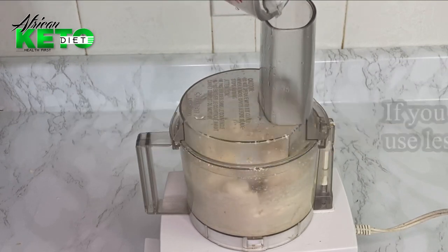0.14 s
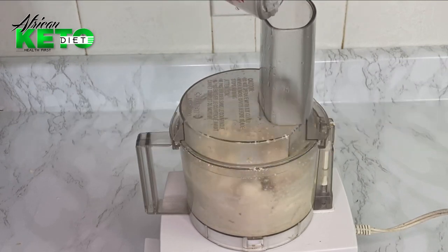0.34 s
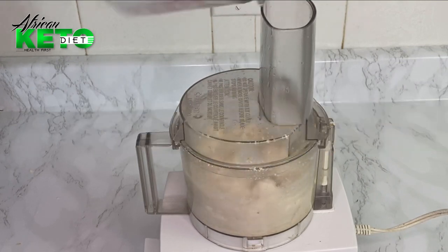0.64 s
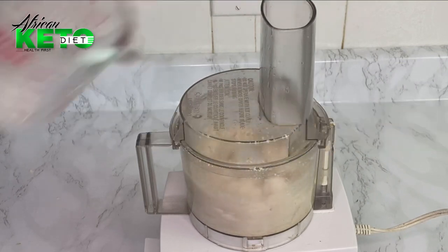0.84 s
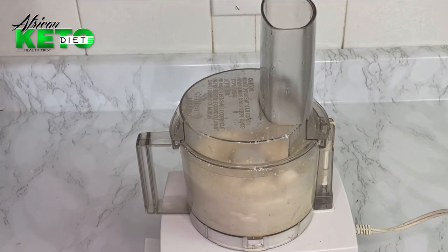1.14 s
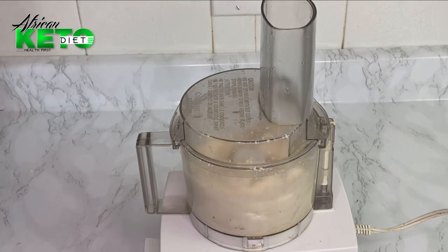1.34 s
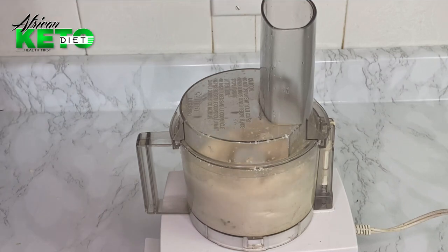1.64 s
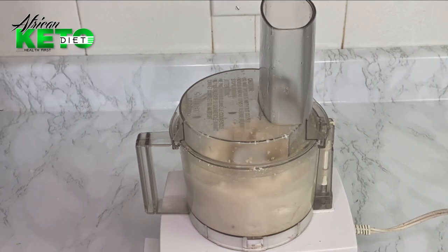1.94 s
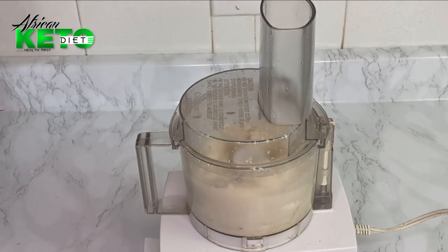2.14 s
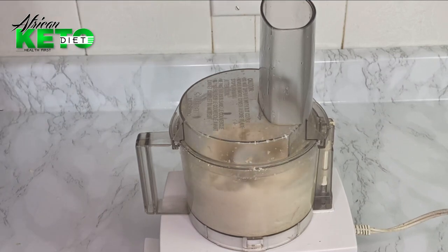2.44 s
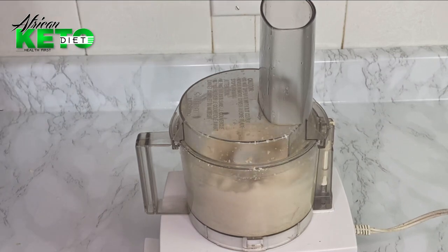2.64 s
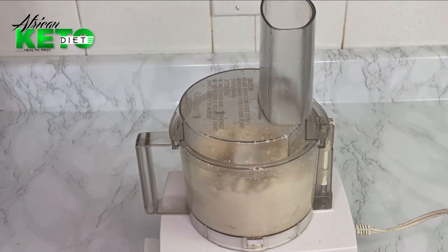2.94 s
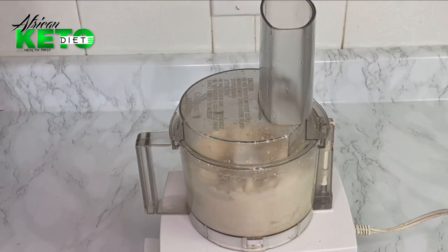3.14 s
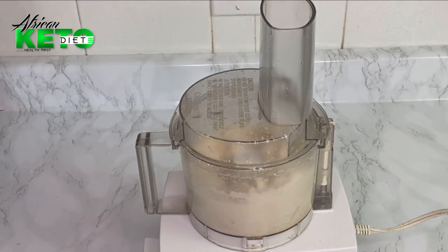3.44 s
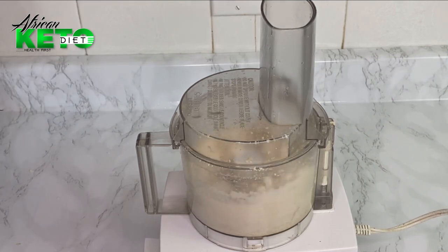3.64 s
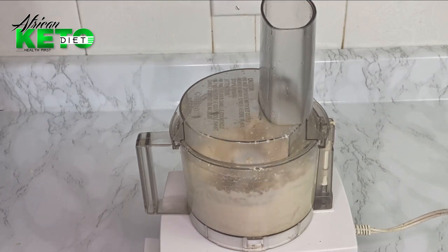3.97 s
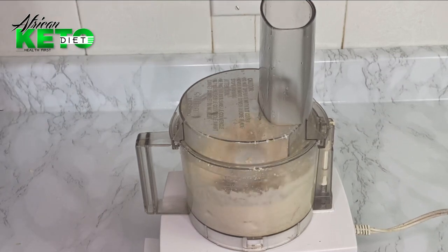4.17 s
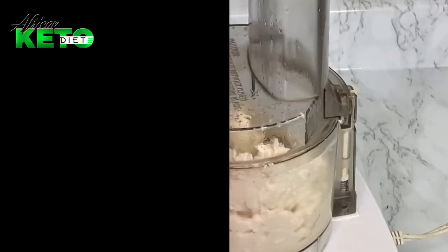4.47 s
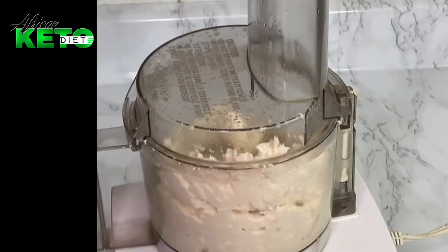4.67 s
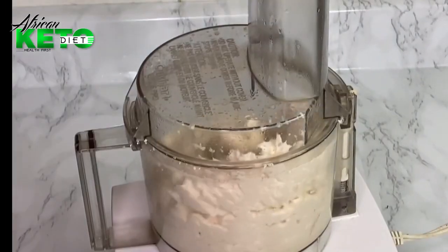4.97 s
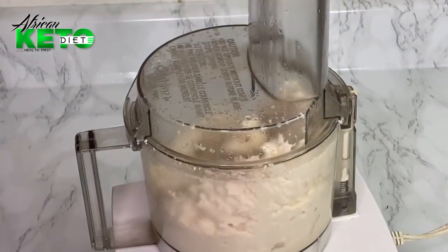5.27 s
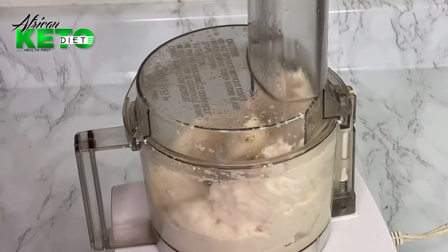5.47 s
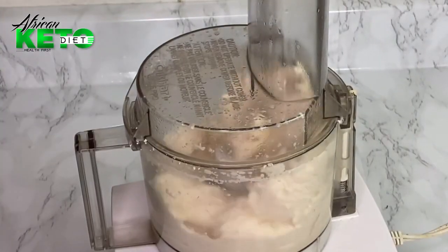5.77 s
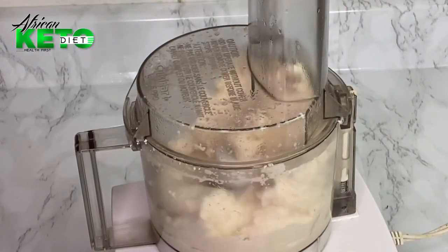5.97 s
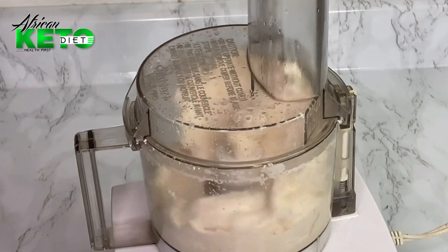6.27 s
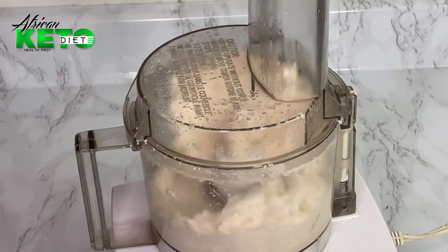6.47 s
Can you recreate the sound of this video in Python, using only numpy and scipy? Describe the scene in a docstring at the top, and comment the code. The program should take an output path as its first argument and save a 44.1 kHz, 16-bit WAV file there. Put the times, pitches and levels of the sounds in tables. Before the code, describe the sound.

From the start a kitchen food processor runs at full strength close to the microphone: a steady, slightly wavering low hum near 120 Hz, dense wet slaps pulsing rapidly with the blade, and a bright rushing fizz of spray. Tiny drops tick against the plastic bowl during the first 1.5 seconds, and a soft low lurch comes at about 1.8. Around 2.7 seconds a glass jug lands on the counter with a cluster of hard, woody thuds and a gritty scuff; at about 3.0 it knocks again and rings with a short clink, with last small bumps until 3.1. The churning calms slightly. At 4.35 a sharp click cuts to a much quieter stretch: the same hum, duller, thicker churning, more prominent low shaking and throbbing hiss, with irregular, faint, very high bearing chirps and a few weak drop ticks. The motor is still running at the end, about 6.6 seconds. Short hard-room reflections.

```python
"""On a kitchen counter a food processor blends flour with hot water.
The induction motor is a set of wavering sines; slaps and fine grains of noise are the churn and the spray.
A glass jug is set down beside it: contact pulses thud on a resonant counter top, and one tap rings the glass.
With a click the scene cuts to a later, quieter stretch, where the blade labours in thick dough
and a bearing chirps in short sine bursts."""
import sys
import numpy as np
from scipy import signal
from scipy.fft import rfft, irfft
from scipy.io import wavfile

SR = 44100
rng = np.random.default_rng(int(sys.argv[2]) if len(sys.argv) > 2 else 0)


def master_out(mix):
    """Clip the mix to full scale and print it as 16-bit PCM to the path in sys.argv[1]."""
    frames = np.transpose(np.atleast_2d(mix))
    ceiling = np.clip(frames, -1, 1)
    pcm = np.round(ceiling * 32767).astype(np.int16)
    wavfile.write(sys.argv[1], SR, pcm)


N = 291501

CUT_S, CUT_END_S = 4.345, 4.382  # the cut to the later, quieter stretch in thick dough begins and ends


def from_db(db):
    """Turn decibels into gain."""
    return 10 ** (np.asarray(db) / 20)


def rms_one(x):
    """Scale to unit power."""
    return x / np.sqrt(np.mean(x ** 2) + 1e-20)


def in_time(rows):
    """Draw each column of a curve table sample by sample, with straight lines between its points."""
    s, *columns = np.transpose(rows)
    return [np.interp(np.arange(N) / SR, s, c) for c in columns]


def bins():
    """Frequencies in Hz of the spectrum of the whole scene, kept at 1 Hz or more."""
    return np.maximum(np.arange(N // 2 + 1) * SR / N, 1)


def colour(x, points):
    """Filter by a (f/Hz, gain/dB) table, with straight lines over log frequency."""
    hz, db = np.transpose(points)
    gain = from_db(np.interp(np.log(bins()), np.log(hz), db))
    return irfft(rfft(x) * gain, N)


def band(x, low_hz, high_hz, order=2):
    """Butterworth band-pass."""
    edges = [low_hz, min(high_hz, .45 * SR)]
    sos = signal.butter(order, edges, "band", fs=SR, output="sos")
    return signal.sosfilt(sos, x + 1e-18)


def unit_in(x, low_hz, high_hz):
    """Scale to unit power inside a band."""
    return x / np.std(band(x, low_hz, high_hz, order=4))


def drift(rate_hz):
    """Slow random wandering with spread 1."""
    spectrum = rfft(rng.standard_normal(N))
    return rms_one(irfft(spectrum / (1 + (bins() / rate_hz) ** 2), N))


def ring(x, hz, t60):
    """Two-pole resonance: a unit click sets off a sine of height 1 that falls 60 dB in t60 seconds."""
    r, w = from_db(-60 / (t60 * SR)), 2 * np.pi * hz / SR
    return signal.lfilter([0, np.sin(w)], [1, -2 * r * np.cos(w), r * r], x + 1e-18)


def grains(per_s, spread_db):
    """Random tiny impacts of uneven size and either sign, at unit power."""
    sizes = from_db(spread_db * np.minimum(rng.exponential(1, N), 5)) * rng.choice([-1, 1], N)
    return rms_one(sizes * (rng.random(N) < per_s / SR))


def bursts(rows, rise_s, fall_s):
    """An envelope that swells from each t/s to its peak level/dB and dies away."""
    out, t = np.zeros(N + SR), np.arange(SR // 10) / SR
    shape = (1 - np.exp(-t / rise_s)) * np.exp(-t / fall_s)
    for s, db in rows:
        at = int(s * SR)
        out[at:at + len(t)] += from_db(db) * shape / shape.max()
    return out[:N]


def tail(t60):
    """A dying cloud of reflections with unit energy, starting after 3 ms."""
    t = np.arange(SR // 2) / SR
    cloud = rng.standard_normal(len(t)) * from_db(-60 * t / t60) * (t > .003)
    return cloud / np.linalg.norm(cloud)


def scatter(x, t60=0.18):
    """Wall reflections scramble the phase and leave the colour alone."""
    cloud = rfft(tail(t60), N)
    return irfft(rfft(x) * cloud / np.abs(cloud), N)


def hum(thick, waver_db=0.58):
    """The stator is pulled twice in each mains cycle; the hum and its overtones waver with the load."""
    # overtones of the magnetic hum, from the fundamental up: [relative level/dB]
    overtones = [-0.5, -33.5, -29, -24, -35.5]
    hum_hz, hum_db = 120.05, -16
    load_waver_db, dough_waver_db, wavers_hz = 0.3, 0.7, 9  # dough adds its waver to the first
    phase = 2 * np.pi * hum_hz * np.arange(N) / SR
    lines = 0
    for k, db in enumerate(overtones, 1):
        # higher overtones waver more
        level = from_db(db + waver_db * k * drift(21))
        lines = lines + level * np.sin(k * phase + rng.uniform(0, 2 * np.pi))
    load_db = (load_waver_db + dough_waver_db * thick) * drift(wavers_hz)
    return np.sqrt(2) * from_db(hum_db + load_db) * lines


def blade_sweep():
    """Two knives pass the heaped side of the mixture in every turn, one deeper than the other."""
    # blade speed, before a small random wander: [t/s, turns per s]
    speed = [(0, 25), (2, 29.3), (4.4, 24.5), (5.3, 30), (6, 31), (6.6, 25)]
    turns_per_s = in_time(speed)[0] + 0.27 * drift(1.6)
    angle = 2 * np.pi * np.cumsum(turns_per_s) / SR
    return (np.cos(angle) + 1.2 * np.cos(2 * angle)) * (1 + 0.15 * drift(10))


def churn(thick, sweep, damping_db=2.5, wander_db=0.5):
    """Dense slaps pulse with the blade and sound through the bowl; thick dough mutes its resonances."""
    # colour of the churning, thin and thick: [f/Hz, relative level per Hz/dB]
    batter_colour = [(100, -29), (170, -3.5), (201, -14), (241, -0.5), (487, 0.5), (720, -7.5), (782, -5),
                     (972, -11.5), (1260, -9.5), (1550, -14.5), (2000, -13.5), (2600, -27.5), (4400, -120)]
    dough_colour = [(100, -19), (170, -10), (209, -37), (241, -1), (270, -11), (413, -13), (487, -13),
                    (962, -25), (1230, -25.5), (1500, -41), (2000, -33), (2600, -52), (4400, -120)]
    # resonances of bowl and lid: [f/Hz, width/Hz, relative level/dB]
    bowl = [(287.5, 43, -14.5), (482, 25, -12.5), (543.4, 27, -9.5), (582, 6.7, -22), (674, 30, -23.5),
            (787, 7.6, -27), (876, 15, -22.5), (1105, 4.7, -22.5), (1236, 11, -16.5), (1283, 29, -16.5),
            (1395, 55, -15), (1897, 19, -19.5), (2020, 12, -24.5)]
    surge = from_db(0.5 * sweep + 0.62 * drift(22))
    slaps = (grains(2200, 2.6) + .5 * rng.standard_normal(N)) * surge
    batter = unit_in(colour(slaps, batter_colour), 250, 1000)
    dough = unit_in(colour(slaps, dough_colour), 250, 1000)
    body = (1 - thick) * from_db(-0.87) * batter + thick * from_db(-0.2) * dough
    modes = 0
    for hz, width, db in bowl:
        # the shifting mixture strikes each resonance with a strength of its own
        blows = grains(700, 3.4) * surge * from_db(wander_db * drift(19))
        t60 = np.log(1000) / (np.pi * width)
        modes = modes + from_db(db) * rms_one(ring(blows, hz, t60))
    return body + modes * from_db(1.5 - damping_db * thick)


def spray(thick, sweep):
    """Fine grains and noise make wet crackle and rushing air; sticky dough makes it throb harder."""
    # colour of spray and rushing air, thin and thick: [f/Hz, relative level per Hz/dB]
    batter_colour = [(1600, -9), (2300, 1.5), (3200, -3), (4100, -3.5), (4900, -9.5), (6000, -10),
                     (7500, -19.5), (9000, -14), (10500, -22.5), (13000, -26.5), (16000, -21.5)]
    dough_colour = [(1600, 8), (2300, 4), (3200, 1), (4100, 0), (4900, -5), (6000, -3.5), (7300, -13),
                    (9000, -4.5), (10800, -24), (12500, -42), (16000, -33)]
    depth_db = 0.6 + 0.25 * thick
    throb = from_db(depth_db * sweep + 0.61 * drift(30))
    fizz = (grains(5000, 2.0) + 0.68 * rng.standard_normal(N)) * throb
    batter, dough = (unit_in(band(colour(fizz, c), 1750, 19000, order=4), 2000, 7000)
                     for c in (batter_colour, dough_colour))
    return (1 - thick) * batter + thick * dough


def rumble(shake_db):
    """The uneven load shakes the housing as low noise; a lump makes it lurch with a low bump."""
    # colour of the shaking housing: [f/Hz, relative level per Hz/dB]
    housing = [(24, -62), (36, -13), (55, -5.5), (90, -1), (110, 2), (135, -1), (149, 9.5), (162, 0),
               (185, -2), (230, -9), (400, -44.5)]
    # lurches of the housing: [t/s, level/dB]
    lurches = [(1.76, -31)]
    shake = from_db(shake_db) * rms_one(colour(rng.standard_normal(N), housing))
    bump = rms_one(band(rng.standard_normal(N), 38, 78))
    return shake + bursts(lurches, 0.028, .05) * bump


def drops():
    """Flung drops tick on the plastic bowl as very short bursts of bright noise."""
    # drops hitting the bowl: [t/s, relative level/dB]
    hits = [(0.2773, -41), (0.3451, -48), (0.4833, -47), (0.9557, -45), (1.4651, -51), (4.9152, -51),
            (5.0933, -54), (5.9145, -56), (6.2392, -55)]
    tick = rms_one(band(rng.standard_normal(N), 3500, 15000))
    return from_db(6) * bursts(hits, .0003, 0.0024) * tick


def counter():
    """Each jug contact is a half-sine push on the counter top; gritty scuffs and a short room tail join."""
    # the jug meets the counter: [t/s, relative level/dB, contact time/ms]
    contacts = [(2.7263, -13.5, 0.35), (2.730, -4, 1.2), (2.736, -5, 2), (2.747, -13, 0.84),
                (2.755, -1.5, 2.64), (2.771, -8.5, 1.14), (2.952, -14, 0.79), (2.968, -15, .8),
                (2.993, -17, 1.05), (3.008, -11, 1.5), (3.049, -16.5, 0.74), (3.094, -12, 2.6)]
    # modes of the counter top: [f/Hz, relative level/dB, t60/s]
    top_modes = [(58, -7, 0.25), (90, -4, 0.056), (163, -8.5, 0.12), (236.5, -1.5, 0.11), (304.4, -5, 0.16),
                 (394, -3.5, 0.15), (500, -1.5, 0.031), (674, -0.5, 0.045), (862, -6, 0.053),
                 (1050, -10, 0.031), (1375, 0, 0.036), (1755, 7, 0.025), (2540, 3.5, 0.016)]
    # the base of the jug scuffs the counter: [t/s, level/dB]
    scuffs = [(2.7245, -27), (2.75, -39), (2.945, -34), (2.99, -37)]
    thuds = np.zeros(N)
    for s, thud_db, contact_ms in contacts:
        at = int(s * SR)
        push = np.sin(np.linspace(0, np.pi, max(int(contact_ms * SR / 1000), 3)))
        thuds[at:at + len(push)] += from_db(thud_db) * push / push.sum()
    top = 0
    for k, (hz, db, t60) in enumerate(top_modes):
        # neighbouring modes answer with opposite signs
        top = top + (-1) ** k * from_db(db - 5.5) * ring(thuds, hz, t60)
    grit = bursts(scuffs, 0.00037, 0.028) * rms_one(band(grains(5000, 2.4), 830, 1770, order=1))
    direct = top + grit
    return direct + .5 * signal.fftconvolve(direct, tail(0.27))[:N]


def jug():
    """The jug thuds down, then one hard tap sets the glass ringing; the ring wavers as the jug rocks."""
    # modes of the glass: [f/Hz, level before the waver/dB, t60/s]
    glass_modes = [(1502, -25.5, .6), (1545, -31, .22), (1588, -23, .65), (2121, -22, .18), (3978, -40, .5),
                   (4900, -40, .08), (6142, -37, .2), (7924, -48, .22)]
    clink_s = 2.9925
    tap = np.zeros(N)
    tap[int(clink_s * SR)] = 1
    glass = sum(from_db(db + 2.2 * drift(45)) * ring(tap, hz, t60) for hz, db, t60 in glass_modes)
    return counter() + glass


def click():
    """One sharp impulse at the cut, dying within a few milliseconds."""
    impulse = np.zeros(N)
    impulse[int(CUT_S * SR)] = .45
    decay_s = .0007
    return signal.lfilter([1], [1, -np.exp(-1 / (decay_s * SR))], impulse)


def slips():
    """Each loud chirp has a weaker second slip; faint ones follow a loose beat in the thick dough."""
    # the loudest bearing chirps: [t/s, relative level/dB]
    chirps = [(4.3743, -39.5), (4.5414, -43), (4.6422, -48.5), (4.742, -49), (4.817, -41.5), (4.8983, -46),
              (4.9995, -44.5), (5.0912, -44.5), (5.1843, -43.5), (5.364, -47), (5.5523, -47),
              (5.657, -42.5), (5.7186, -44), (5.8405, -47), (5.9096, -49), (5.9848, -45), (6.14, -44.5)]
    reslip_s, reslip_db = 0.028, -9  # second slip: typical delay, and level against the first
    faint_per_s, faint_db, faint_spread_db = 11, -53, 5.5
    faint_end_s = 5.8
    seconds = [(s + reslip_s * rng.uniform(0.93, 1.14), db + reslip_db) for s, db in chirps]
    chance = rng.standard_normal(size=(40, 2))
    beats = np.arange(len(chance)) + 1 + 0.19 * chance[:, 0]
    times = CUT_END_S + beats / faint_per_s
    faint = [(s, faint_db + faint_spread_db * luck)
             for s, luck in zip(times, chance[:, 1]) if s < faint_end_s]
    return list(chirps) + seconds + faint


def bearing(pitch_hz=8230, sag_hz=260):
    """The loaded bearing sticks and slips in short, high chirps; the harder it grips, the lower the pitch."""
    grip = bursts(slips(), .004, .007)
    hz = pitch_hz - sag_hz * grip / grip.max() + 90 * drift(63.5)
    flicker = from_db(1.5 + 1.2 * drift(90))
    return flicker * grip * np.sin(2 * np.pi * np.cumsum(hz) / SR)


def scene():
    """Machine and jug before the microphone: vigour drives churn and spray, tile reflections give width."""
    # how hard the mixture is flung; it calms as the flour takes up the water: [t/s, vigour/dB]
    vigour = [(0, 0.8), (0.55, 2.5), (2.5, 0.3), (3.9, -1.1), (4.2, 1.5), (4.8, 0), (5.6, -0.4), (6.6, 0.5)]
    # width, side against mid; the jug stands off to one side: [f/Hz, machine level/dB, jug level/dB]
    width = [(60, -18, -25), (130, -17.5, -21), (175, -22, -5), (235, -10.5, -17), (380, -16, -6),
             (567, -15, 2), (730, -9.5, -1), (1050, -9, 5), (1270, -12.5, 0), (1750, -5, -9),
             (1960, -14.5, 4), (2300, -51, -37), (3160, -32, -32), (3800, -90, -46), (6960, -79, -37)]
    spray_base_db, churn_base_db, rumble_base_db = -38, -29.5, -33.5  # in batter, at a vigour of 0 dB
    churn_follows = 0.76  # share of the vigour's swing that reaches the churning
    dough_churn_db, dough_rumble_db = 1.0, 10.5  # thick dough slaps and shakes harder, before later_gain
    surge_db, surges_hz = 0.64, 3.3  # lumps make the vigour wander
    lean_db = .1  # left up, right down

    thick, = in_time([(CUT_S, 0), (CUT_END_S, 1)])
    # the later stretch has quieter motor, mixture and rumble; drops and bearing are set apart from this
    later_gain = from_db(-15.5 * thick)
    sweep = blade_sweep()
    vigour_db = in_time(vigour)[0] + surge_db * drift(surges_hz)
    churn_db = churn_base_db + churn_follows * vigour_db + dough_churn_db * thick
    churning = from_db(churn_db) * churn(thick, sweep)
    spraying = from_db(spray_base_db + vigour_db) * spray(thick, sweep)
    shaking = rumble(rumble_base_db + dough_rumble_db * thick)
    machine = later_gain * (churning + spraying + shaking) + drops() + bearing()
    motor, knocks = later_gain * hum(thick), jug()

    hz, machine_db, jug_db = np.transpose(width)
    machine_side = colour(scatter(machine + from_db(-15.5) * motor), np.c_[hz, machine_db])
    # a lag between the ports turns the jug's side signal a quarter cycle
    jug_side = colour(signal.hilbert(knocks).imag, np.c_[hz, jug_db])
    side = (machine_side + jug_side) * [[1], [-1]]
    return (machine + motor + knocks + side) * from_db([[lean_db], [-lean_db]])


def record(dry):
    """Top treble lags in the left port and bleeds between ports; a central click joins; the very top is cut."""
    lag_s, split_hz, bleed = .000289, 7600, 0.13
    cutoff_hz = 15750
    hz = bins()
    late = np.where(hz > split_hz, np.exp(-2j * np.pi * hz * lag_s), 1)
    responses = np.array([late + bleed, 1 + bleed * late]) / (1 + bleed)
    ports = irfft(rfft(dry) * responses, N)
    low_pass = signal.ellip(10, .1, 80, cutoff_hz, fs=SR, output="sos")
    return signal.sosfilt(low_pass, ports + click())


dry = scene()
out = record(dry)
master_out(out)
```